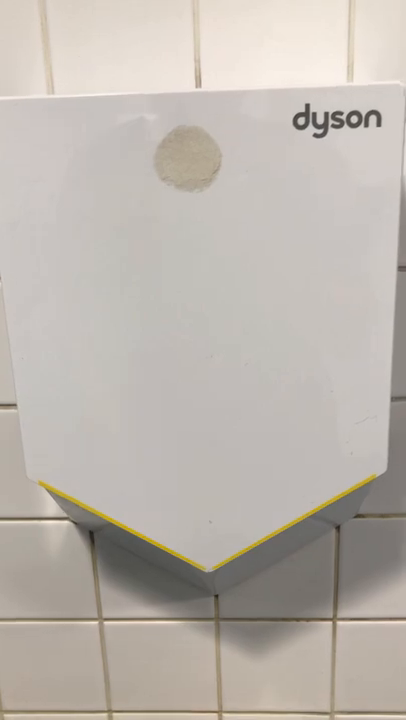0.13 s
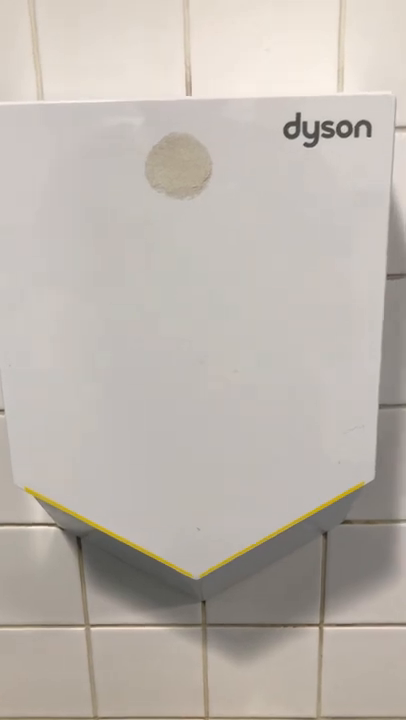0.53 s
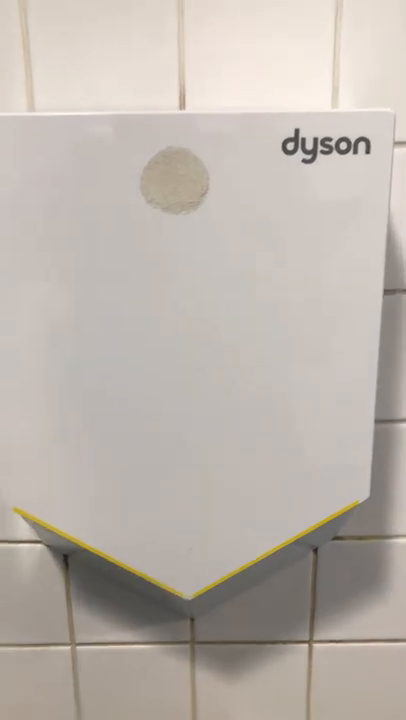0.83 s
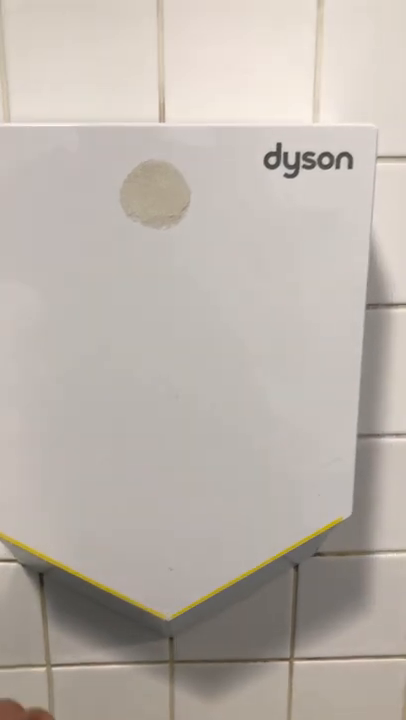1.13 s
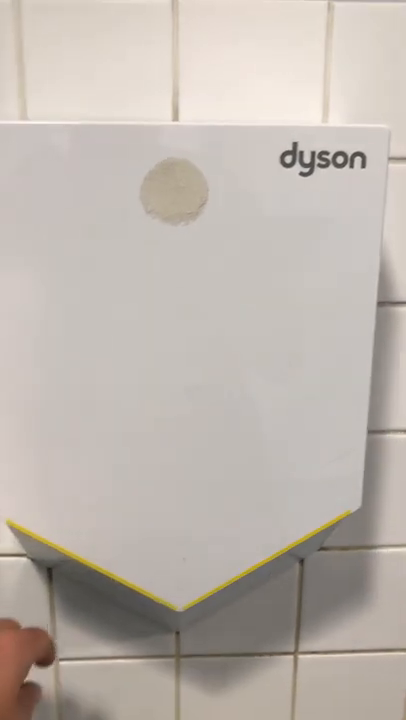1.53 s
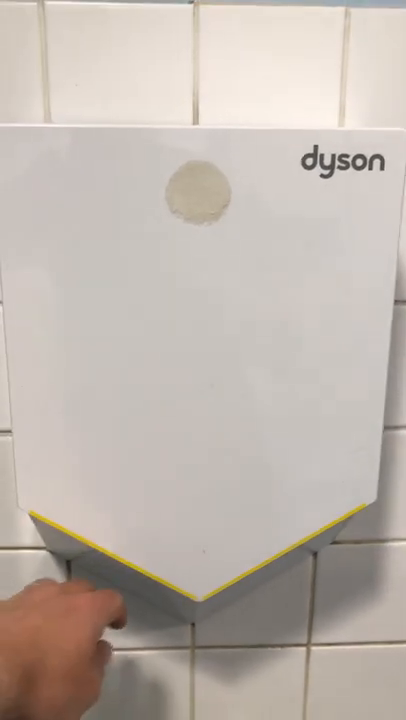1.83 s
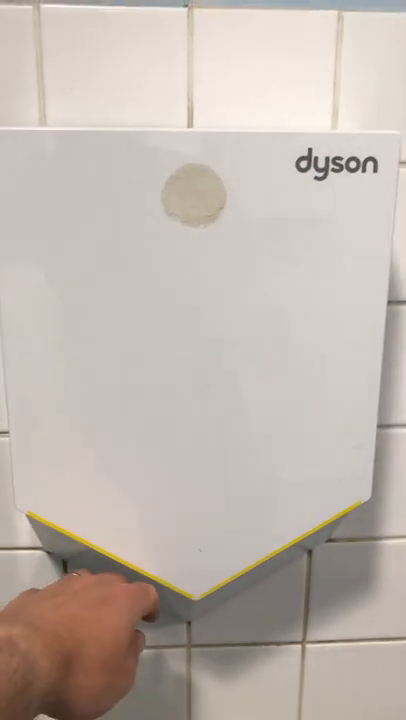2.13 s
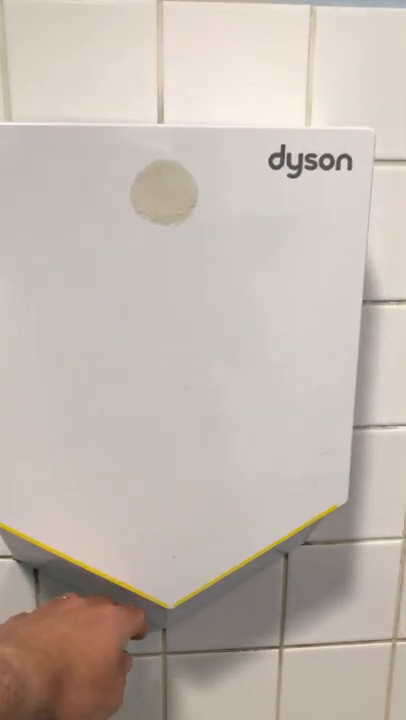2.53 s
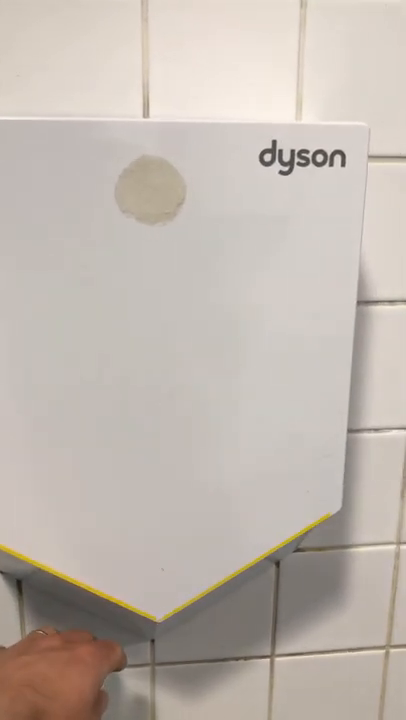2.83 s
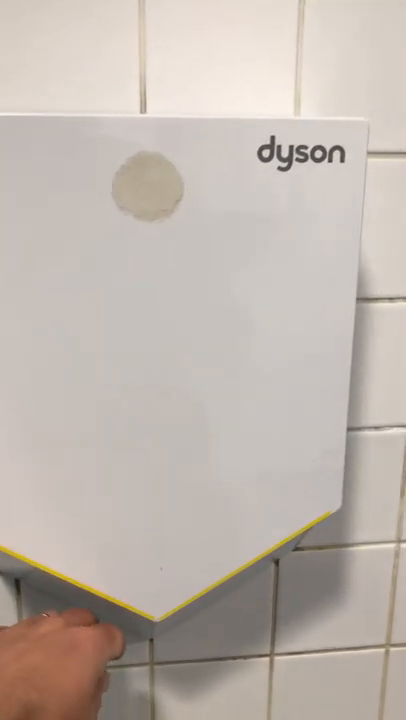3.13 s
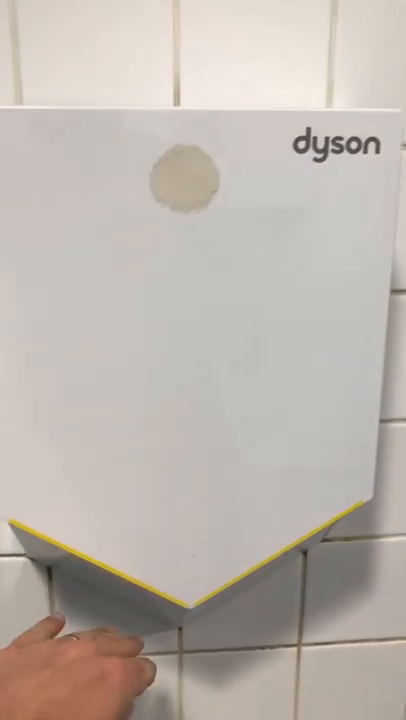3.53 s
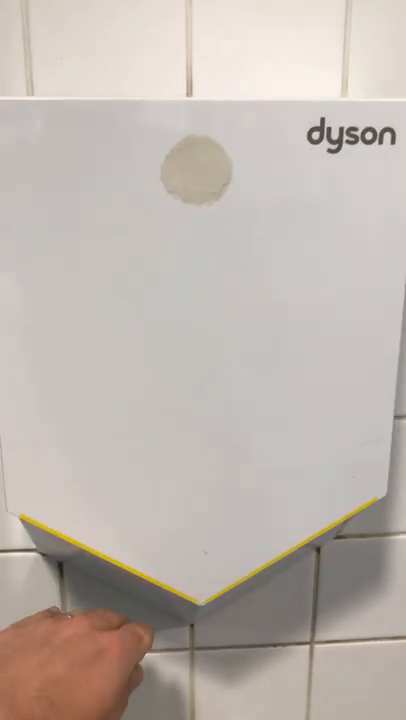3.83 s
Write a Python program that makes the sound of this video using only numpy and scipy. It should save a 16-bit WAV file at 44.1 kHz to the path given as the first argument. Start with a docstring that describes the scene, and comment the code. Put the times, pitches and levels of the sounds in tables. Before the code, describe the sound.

An electric hand dryer close by in a lightly echoing tiled washroom. Until 2.5 s only very quiet low ventilation hum with faint wavering tones, plus soft sleeve rustles near 1.2 and 1.9-2.3 s. At 2.5 s clicks, chatter, a small thump and a brief squeal; the whine climbs within half a second. Loud air hisses over low mains buzz, hollow duct ringing, and roar on the hand from 3.1 s, cutting off at full strength around 4 s.

```python
"""Tiled washroom, a wall-mounted hand dryer heard from close by.
Ventilation (shaped noise with wavering tones) hums; a sleeve (grainy noise bands) rustles as a hand reaches in.
The motor clicks and chatters, then whines up close to full speed in about half a second, ringing its casing.
The air jet, noise that grows with motor speed, hisses loudly over a mains buzz, rings the duct
and roars on the hand."""
import sys
import numpy as np
from scipy import signal
from scipy.fft import rfft, irfft, next_fast_len
from scipy.io import wavfile
from scipy.ndimage import map_coordinates

SR = 44100
rng = np.random.default_rng(int(sys.argv[2]) if len(sys.argv) > 2 else 0)


def waveform_to_disk(signal):
    """Save audio, clipped to [-1, 1], as 16-bit WAV at the path in sys.argv[1]."""
    frames = np.transpose(np.atleast_2d(signal))
    scaled = np.clip(frames, -1, 1) * 32767
    samples = np.round(scaled).astype(np.int16)
    wavfile.write(sys.argv[1], SR, samples)


N = 176400
T = np.arange(N) / SR


def amp(db):
    """Decibels to gain."""
    return 10 ** (np.asarray(db) / 20)


def unit(x):
    """Scale to rms 1."""
    return x / np.sqrt(np.mean(x ** 2) + 1e-20)


def along(points, hz):
    """Interpolate (Hz, value) points on a log frequency axis."""
    f, v = np.transpose(points)
    return np.interp(np.log(hz + 1), np.log(f + 1), v)


def level(points):
    """Gain over time from (s, dB) points."""
    return amp(np.interp(T, *np.transpose(points)))


def bell(x, centre, width):
    """Gaussian of peak 1; width is one standard deviation."""
    return np.exp(-.5 * ((x - centre) / width) ** 2)


def wobble(knots_per_s):
    """Smooth random curve through normal-distributed knots."""
    return map_coordinates(rng.standard_normal(N // 20), [T * knots_per_s + 2], mode="wrap")


def filtered(x, response):
    """Multiply the spectrum of x by a response of frequency."""
    m = next_fast_len(N + SR // 2)
    return irfft(rfft(x, m) * response(np.fft.rfftfreq(m, 1 / SR)), m)[..., :N]


def noise(response):
    """Coloured noise of rms 1."""
    return unit(filtered(rng.standard_normal(N), response))


def rush(spectrum):
    """Noise of rms 1 with a (Hz, dB) spectrum."""
    return noise(lambda f: amp(along(spectrum, f)))


def resonances(rows):
    """Summed second-order band-pass responses of (Hz, width Hz, dB) rows."""
    return lambda f: sum(amp(db) * 1j * f * w / (c * c - f * f + 1j * f * w) for c, w, db in rows)


def tone(cycles):
    """Sine of rms 1 from its phase in cycles."""
    return np.sqrt(2) * np.sin(2 * np.pi * cycles)


# Ventilation spectrum. Each row: frequency in Hz, relative density in dB per Hz.
VENT_SPECTRUM = [(25, -8.5), (45, -9), (65, 3), (125, -6), (178, -7.5), (378, -11.5), (450, -19),
                 (741, -15.5), (1110, -18), (2060, -23), (2600, -28), (4500, -31.5), (7000, -33.5),
                 (10400, -37.5), (15500, -36.5)]
# Ventilation tones. Each row: centre in Hz, standard deviation in Hz, relative gain in dB.
VENT_TONES = [(1001, 12, -2), (915, 10, -11.5), (555, 14, -13.5)]
# Swell of the tones. Each row: time in seconds, level in dB.
VENT_SWELL = [(.1, -68), (.72, -69), (.85, -61), (1.3, -67), (1.44, -71), (1.55, -64.5), (2.0, -64.5),
              (2.45, -67)]
VENT_DB = -58


def ventilation():
    """Steady low rush plus narrow noise bands, heard as wavering tones."""
    tones = noise(lambda f: sum(amp(db) * bell(f, hz, w) for hz, w, db in VENT_TONES))
    return amp(VENT_DB) * rush(VENT_SPECTRUM) + level(VENT_SWELL) * tones


# Sleeve rustles. Each row: peak in seconds, rise in seconds, fall in seconds, level in dB,
# centre in Hz, standard deviation in octaves.
RUSTLES = [(.33, .06, 1, -72.5, 3770, 0.97), (1.21, .008, 0.07, -63.5, 4750, 0.72),
           (1.9, 0.035, .3, -64.5, 1560, .55), (2.04, .05, .16, -67, 1800, 0.79),
           (2.17, 0.11, 0.38, -73, 4500, 0.71), (2.29, 0.049, .13, -62, 1380, 0.32)]
RUSTLE_GRAIN_DB = 2


def sleeve():
    """Cloth swishes: grainy noise bands with exponential rise and fall."""
    out = np.zeros(N)
    for s, rise, fall, db, hz, octaves in RUSTLES:
        shape = np.exp(np.where(T < s, (T - s) / rise, (s - T) / fall))
        grain = amp(RUSTLE_GRAIN_DB * wobble(120))
        band = noise(lambda f: bell(np.log2((f + 1) / hz), 0, octaves))
        out += amp(db) * shape * unit(grain * band)
    return out


START_S, SPIN_UP_S = 2.4976, .295  # motor start, tanh time constant


def speed():
    """Share of full motor speed: a steady pull that levels off."""
    return np.tanh(np.maximum(T - START_S, 0) / SPIN_UP_S)


# Mains buzz. Each row: frequency in Hz, level in dB.
BUZZ = [(100, -39.5), (200, -38.5)]
BUZZ_RISE_S, BUZZ_WAVER_DB, BUZZ_WAVER_RAD = 0.11, 2, 0.22


def buzz():
    """Mains ripple shakes the motor as soon as it draws current."""
    out = np.zeros(N)
    for hz, db in BUZZ:
        waver = amp(db + BUZZ_WAVER_DB * wobble(9))
        out += waver * tone(hz * T + BUZZ_WAVER_RAD * wobble(9.7) / (2 * np.pi))
    return out * (1 - np.exp(-np.maximum(T - START_S, 0) / BUZZ_RISE_S))


JET_START_S, JET_RISE_S, PUFF_SHARE, FLUTTER_DB = 2.534, .003, 0.17, 0.38


def flow(db_per_decade, full_speed):
    """Air gain: a first puff, then a power of motor speed until the jet is full."""
    share = np.clip(speed() / full_speed, PUFF_SHARE, 1)
    onset = (1 + np.tanh((T - JET_START_S) / JET_RISE_S)) / 2
    return amp(db_per_decade * np.log10(share) + FLUTTER_DB * wobble(14)) * onset


# Duct and wall-corner resonances. Each row: centre in Hz, width in Hz, relative gain in dB.
DUCT = [(280.2, 8.4, 1), (439.6, 17, -3), (538, 22, 0.5), (587, 11, 2.5), (679, 42, 1), (805, 17, -0.5),
        (917, 35, -1), (1067, 23, 2), (1183, 43, -0.5), (1467, 25, -2)]
# Ring of the duct. Each row: time in seconds, level at full flow in dB.
DUCT_SWELL = [(2.72, -29), (2.81, -22), (2.92, -23.5), (3.05, -25), (3.4, -27), (3.98, -28)]
# Roar spectrum of air on the hand. Each row: frequency in Hz, relative density in dB per Hz.
ROAR_SPECTRUM = [(100, -15), (500, -12.5), (1100, -4), (2000, 0.5), (3000, -1.5), (4500, -6.5),
                 (6500, -8.5), (9000, -13), (15800, -29)]
# Hand in the jet. Each row: time in seconds, level of the roar at full flow in dB.
HAND = [(2.72, -50), (2.82, -39), (3.02, -27.5), (3.16, -20), (3.32, -20), (3.56, -23), (3.76, -21.5),
        (3.86, -21), (3.99, -17)]
DUCT_DB_PER_DECADE, DUCT_FULL_SPEED = 82, 0.86


def blast():
    """Air rings the duct and roars on the hand."""
    roar = level(HAND) * rush(ROAR_SPECTRUM)
    air = flow(DUCT_DB_PER_DECADE, DUCT_FULL_SPEED)
    ring = level(DUCT_SWELL) * noise(resonances(DUCT))
    return air * (ring + roar)


# Jet spectrum. Each row: frequency in Hz, relative density in dB per Hz.
HISS_SPECTRUM = [(25, -34), (60, -6), (120, -2), (400, 0.5), (1200, 0.5), (2500, -0.5), (4200, -.5),
                 (6200, -2.5), (8500, -5), (12500, -3), (15800, -6)]
# Jet loudness. Each row: time in seconds, level at full flow in dB.
HISS_LEVEL = [(2.75, -15.5), (2.86, -16), (2.96, -16.8), (3.2, -16.5), (3.33, -16.5), (3.5, -17.5),
              (3.72, -16.5), (3.81, -17.5), (3.98, -16.5)]
HISS_DB_PER_DECADE, HISS_FULL_SPEED = 34.5, 0.78
PULSE_HZ, PULSE_DEPTH = 101, 0.048


def hiss():
    """The jet leaves the slots as noise, pulsing slightly with the mains."""
    pulsing = 1 + PULSE_DEPTH * np.sin(2 * np.pi * PULSE_HZ * T)
    return level(HISS_LEVEL) * flow(HISS_DB_PER_DECADE, HISS_FULL_SPEED) * rush(HISS_SPECTRUM) * pulsing


SQUEAL_DB, SQUEAL_HZ, SQUEAL_SIGMA_HZ = -37, 4440, 190
SQUEAL_AT_S, SQUEAL_SIGMA_S, SQUEAL_SHAKE_DB = 2.572, 0.022, 4


def squeal():
    """Short ragged noise band as the rotor gathers speed."""
    shape = bell(T, SQUEAL_AT_S, SQUEAL_SIGMA_S) * (T > START_S)
    band = noise(lambda f: bell(f, SQUEAL_HZ, SQUEAL_SIGMA_HZ))
    return amp(SQUEAL_DB) * shape * unit(band * amp(SQUEAL_SHAKE_DB * wobble(80)))


# Casing resonances. Each row: centre in Hz, width in Hz, relative gain in dB.
CASING = [(1230, 41, 2), (1820, 220, -1.5), (2320, 58, -2), (3330, 60, -1), (4270, 200, 4), (4540, 69, -4)]
CASING_TOP_HZ = 5100


def casing(f):
    """Casing response: summed resonances with a steep treble roll-off."""
    return resonances(CASING)(f) / (1 + (f / CASING_TOP_HZ) ** 12)


# Motor whine. Each row: multiple of shaft speed, level in dB.
ORDERS = [(4, -39.5), (8, -43)]
SHAFT_HZ, SPEED_JITTER = 1816, .035  # full speed, relative jitter
WHINE_RISE_S, WHINE_SHAKE_DB = 0.074, 2
WHINE_FADE_S, WHINE_FADE_DB_PER_S = 2.7, 14  # fade start, slope


def whine():
    """Shaft-speed multiples glide up with the motor, roughened by speed jitter."""
    turns = np.cumsum(SHAFT_HZ * speed() * (1 + SPEED_JITTER * wobble(400))) / SR
    tones = sum(amp(db + WHINE_SHAKE_DB * wobble(70)) * tone(round(k) * turns) for k, db in ORDERS)
    rise = np.clip((T - START_S) / WHINE_RISE_S, 0, 1)
    return tones * rise * amp(-WHINE_FADE_DB_PER_S * np.maximum(T - WHINE_FADE_S, 0))


# Kick-in clicks. Each row: start in seconds, level in dB.
KICKS = [(2.483, -49), (2.508, -47)]
KICK_DECAY_S = 0.0089
CHATTER_DB, CHATTER_AT_S, CHATTER_SIGMA_S = -35, 2.555, 0.032


def rattle():
    """Clicks and starting chatter: noise bursts ringing the casing."""
    chatter = amp(CHATTER_DB) * bell(T, CHATTER_AT_S, CHATTER_SIGMA_S) * (T > START_S)
    clicks = sum(amp(db) * np.exp(-np.abs(T - s) / KICK_DECAY_S) * (T > s) for s, db in KICKS)
    contacts = rng.standard_normal(N)
    return filtered(contacts * (chatter + clicks), casing) / np.std(filtered(contacts, casing))


THUMP_DB, THUMP_HZ, THUMP_DECAY_S = -42.5, 85, .12


def jolt():
    """Low decaying thump at motor start."""
    decay = np.exp(-np.maximum(T - START_S, 0) / THUMP_DECAY_S) * (T > START_S)
    low = noise(lambda f: resonances([(THUMP_HZ, 2 * THUMP_HZ, 0)])(f) ** 2)
    return amp(THUMP_DB) * decay * low


CASING_RING_DB, RING_FADE_DB_PER_S = 8.5, 72  # gain before the fade, slope


def motor():
    """Rising whine, direct and through the casing, with rattle and jolt."""
    direct = whine()
    strain = amp(CASING_RING_DB - RING_FADE_DB_PER_S * np.maximum(T - WHINE_FADE_S, 0))
    return direct + filtered(strain * direct, casing) + rattle() + jolt()


# Reverberation of the tiles. Each row: frequency in Hz, 60 dB decay time in seconds.
TILES = [(100, 0.54), (1000, 0.61), (4000, 0.32), (14000, 0.5)]
ROOM_DB = -11.5  # reverberant re direct


def washroom(x):
    """Direct sound plus a noise tail decaying per frequency, as off tiled walls."""
    hz, t, z = signal.stft(rng.standard_normal(SR // 2), SR, nperseg=256)
    decay = amp(-60 * t / along(TILES, hz)[:, None])
    tail = signal.istft(z * decay, SR, nperseg=256)[1]
    wet = signal.fftconvolve(x, tail / np.linalg.norm(tail))[:N]
    return (x + amp(ROOM_DB) * wet) / np.sqrt(1 + amp(ROOM_DB) ** 2)


def scene():
    """One microphone: both channels carry the same sound; buzz and ventilation bypass the reverberation."""
    mono = washroom(motor() + squeal() + hiss() + blast() + sleeve()) + buzz() + ventilation()
    return np.array([mono, mono])


# Microphone dips. Each row: centre in Hz, standard deviation in Hz, depth in dB.
DIPS = [(4870, 180, 3), (7550, 440, 3), (10400, 250, 4.5)]
TOP_HZ = 15800


def record(dry):
    """Microphone response: treble dips and a band limit."""
    def response(f):
        limit = np.clip((TOP_HZ + 100 - f) / 200, 0, 1) ** 2
        return amp(-sum(db * bell(f, hz, w) for hz, w, db in DIPS)) * limit
    return filtered(dry, response)


dry = scene()
out = record(dry)
waveform_to_disk(out)
```